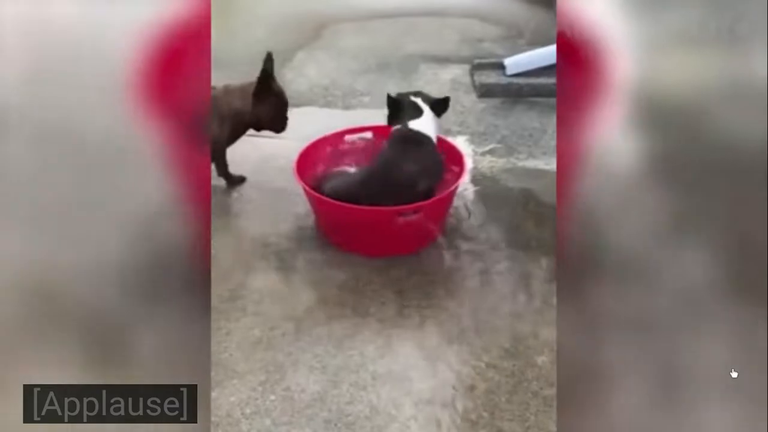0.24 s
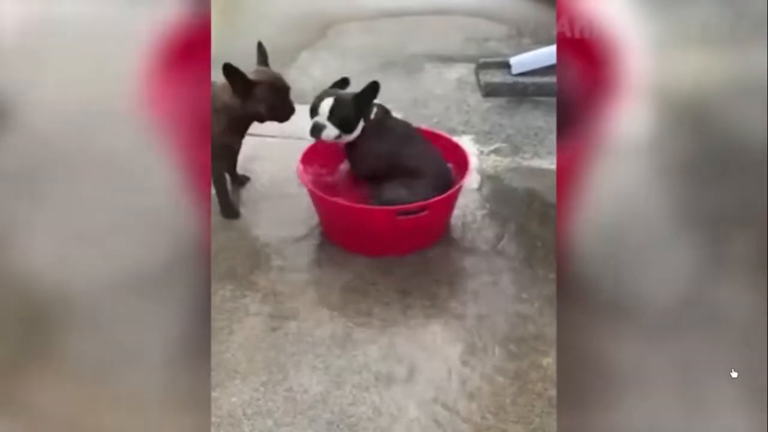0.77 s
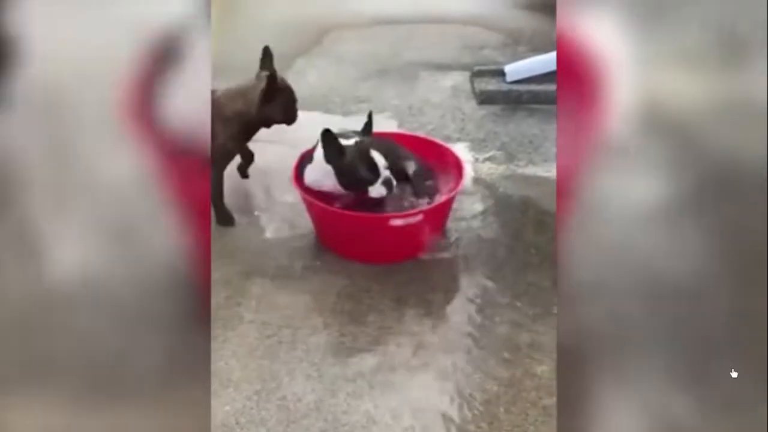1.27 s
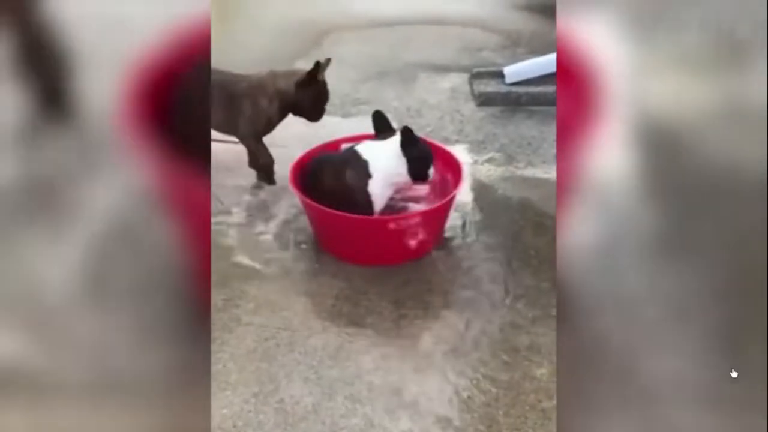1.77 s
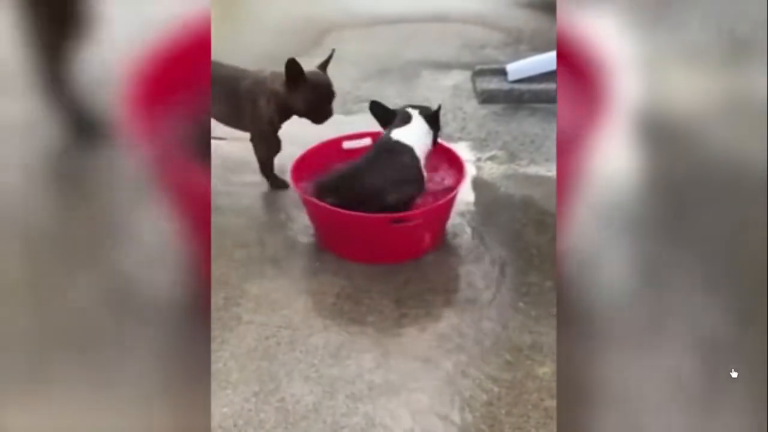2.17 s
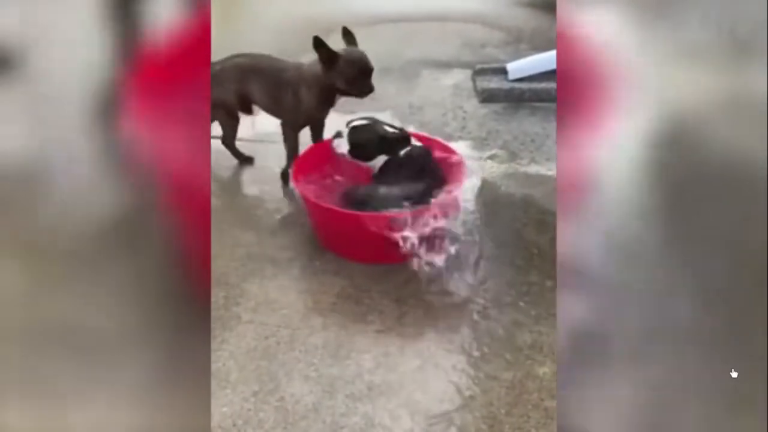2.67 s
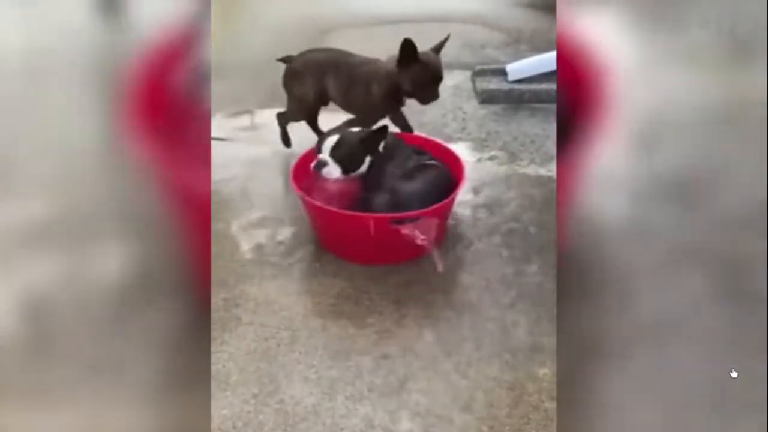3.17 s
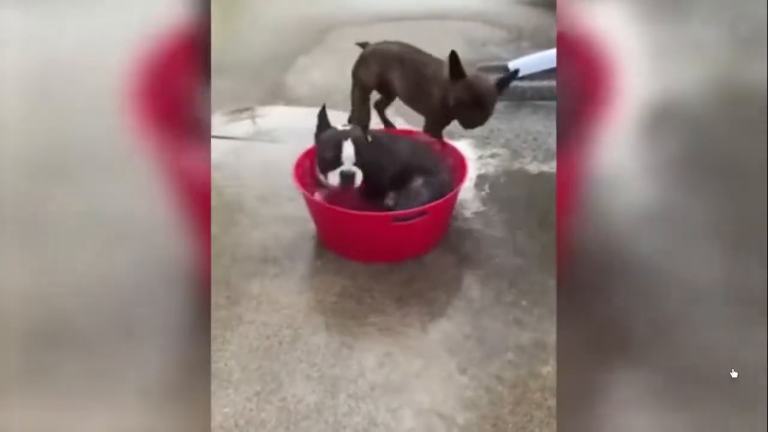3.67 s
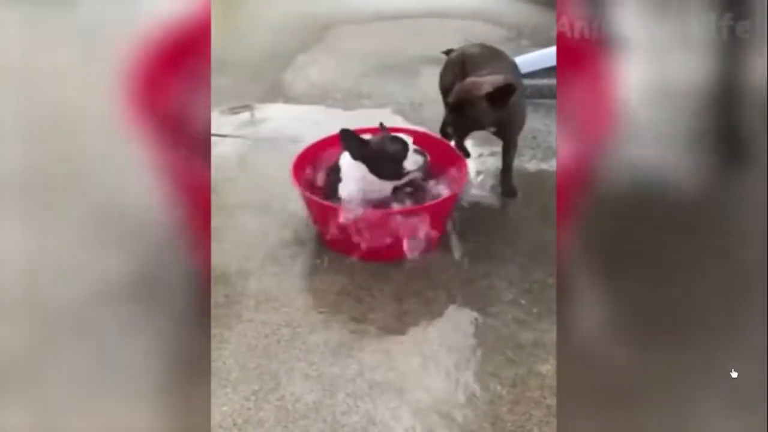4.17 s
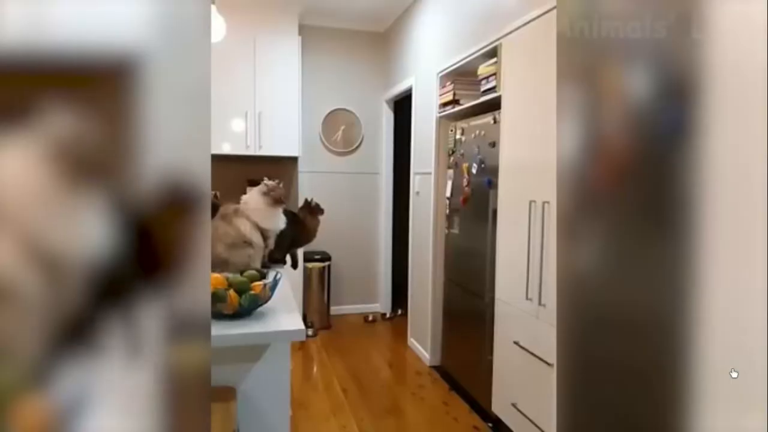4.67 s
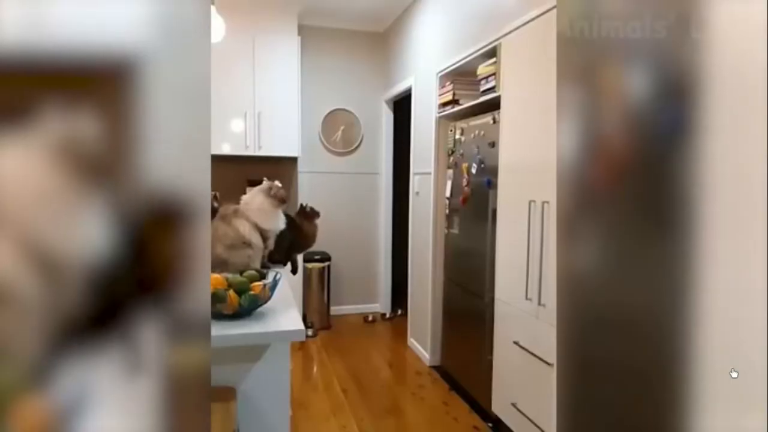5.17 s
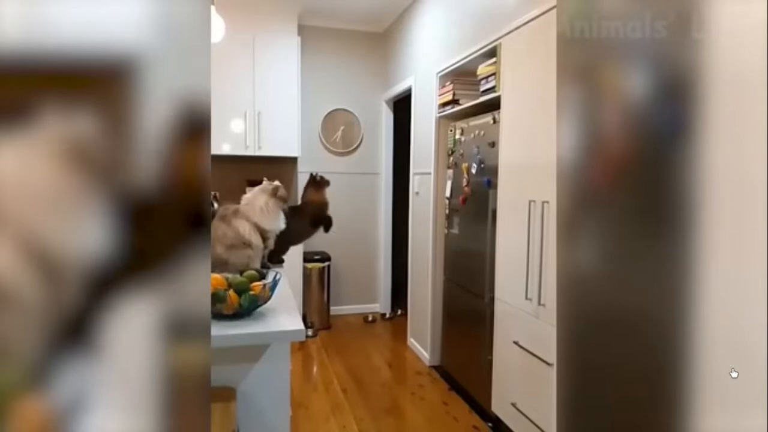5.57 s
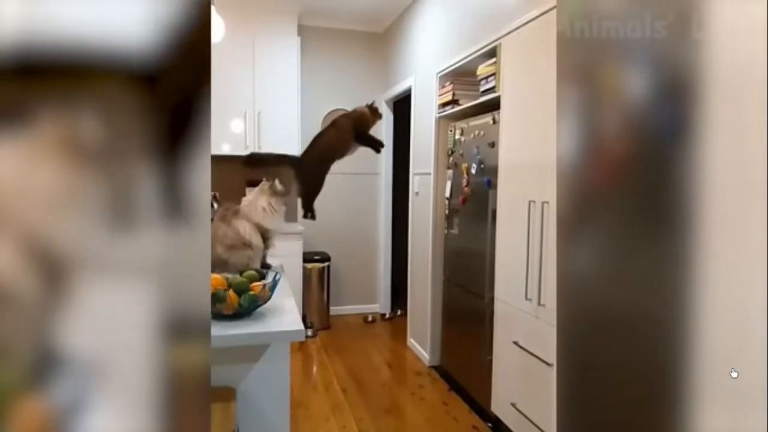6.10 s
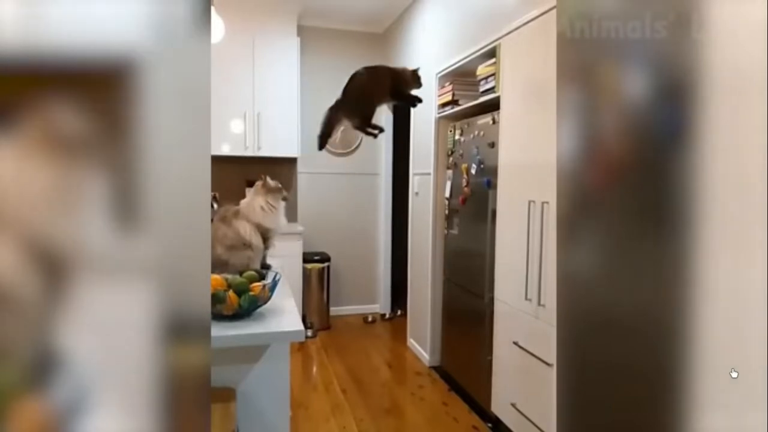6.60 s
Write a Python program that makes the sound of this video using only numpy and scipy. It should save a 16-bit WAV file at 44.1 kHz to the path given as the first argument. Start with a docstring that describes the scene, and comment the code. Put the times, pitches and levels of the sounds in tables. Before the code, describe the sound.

From the start, water sloshes close by in a hollow plastic tub as a small dog wriggles in it. Uneven surges come several times a second, full of gurgles, froth and sharp plops, while water slaps over the rim and spatters on concrete. The splashing is strongest around 2.2, 3 and 4.5 seconds, the loudest plops slightly overloading. Wet skin squeaks briefly on the plastic at about 3.8 seconds. A far motor hums faintly, growing a little toward the end of the splashing.

At about 4.7 seconds the sound cuts abruptly to a much quieter kitchen: room tone, a hollow whirr and a very faint high electrical whine. From 5 seconds until the end, near 7 seconds, come a few soft rustles and scuffs as a cat moves. A low rumble lies under both places.

```python
"""Water sloshes in a plastic tub as a small dog wriggles in it, close by, on a concrete yard.
Each slosh traps bubbles, big air pockets plop, and water slaps over the rim and spatters the ground.
Wet skin squeaks once on the plastic, a motor hums far off and the loudest plops overload.
Then the scene cuts to a quiet kitchen: room tone, a whirr, soft rustles and a faint whine.
A low rumble runs under both."""
import sys
import numpy as np
from scipy import signal
from scipy.fft import rfft, irfft
from scipy.io import wavfile
from scipy.ndimage import uniform_filter1d

SR = 44100
rng = np.random.default_rng(int(sys.argv[2]) if len(sys.argv) > 2 else 0)


def to_wav(s):
    """Save 16-bit WAV."""
    ch = np.atleast_2d(s).T  # columns
    pcm = np.round(np.clip(ch, -1, 1) * 32767)  # PCM
    wavfile.write(sys.argv[1], SR, pcm.astype(np.int16))


N = 301644
TIME = np.arange(N) / SR
HZ = np.fft.rfftfreq(N, 1 / SR)


def sloshing(attack_s=0.013, release_s=0.026, rest_hz=1850):
    """Each shove of the dog stirs the water. Returns wash, gurgle and froth gains, and froth pitch."""
    # Each row: start in s, length in s, relative wash, gurgle and froth levels in dB, froth pitch in Hz.
    shoves = [(0.056, 0.17, -50, -24.5, -29.5, 1800), (0.288, 0.12, -46, -26, -15.5, 2000),
              (0.41, 0.08, -40.5, -20, -13.5, 1760), (0.523, 0.043, -49.5, -17.5, -21, 1900),
              (0.624, 0.048, -43, -22, -17.5, 2250), (0.74, 0.067, -59, -21, -20.5, 2150),
              (0.835, 0.076, -38, -12.5, -19, 1900), (1.071, 0.0093, -31, -32, -14.5, 1830),
              (1.15, 0.2, -54, -28, -26.5, 1700), (1.32, 0.063, -61, -28, -19.5, 2050),
              (1.409, 0.09, -47, -27.5, -14.5, 2170), (1.487, 0.1, -38.5, -22.5, -18.5, 1650),
              (1.626, 0.13, -45.5, -26.5, -25, 2150), (1.79, 0.014, -35.5, -23.5, -12.5, 1510),
              (1.964, 0.038, -38.5, -32, -14.5, 2140), (2.212, 0.15, -38.5, -20.5, -20, 1800),
              (2.39, 0.15, -40, -19.5, -16.5, 2110), (2.582, 0.1, -34, -14, -14, 1850),
              (2.724, 0.25, -40.5, -21, -19.5, 1950), (2.981, 0.16, -38, -20, -12, 2105),
              (3.147, 0.11, -42, -24.5, -19, 2080), (3.345, 0.14, -39, -31, -19.5, 2400),
              (3.511, 0.2, -36, -21, -21, 2300), (3.743, 0.12, -34, -19, -15, 1750),
              (4.024, 0.12, -34, -21.5, -18.5, 1900), (4.166, 0.074, -38, -21.5, -12, 2350),
              (4.254, 0.055, -34.5, -20, -17, 1600), (4.358, 0.065, -37, -23, -18, 2100),
              (4.457, 0.28, -40, -24.5, -15.5, 2120)]
    rest_db = [[-43], [-27], [-26]]  # wash, gurgle, froth: the water never settles
    power = gain_of(rest_db) ** 2 * np.ones(N)
    weighted_hz = power[-1] * rest_hz
    for start_s, length_s, wash_db, gurgle_db, froth_db, hz in shoves:
        push = surge(start_s, length_s, attack_s, release_s)
        added = (gain_of([[wash_db], [gurgle_db], [froth_db]]) * push) ** 2
        power += added
        weighted_hz += added[-1] * hz
    return (*np.sqrt(power), weighted_hz / power[-1])


def churn():
    """Large trapped bubbles gurgle and small ones froth, over the dull wash of moving water."""
    # Each row of both: frequency in Hz, relative spectral level in dB.
    bubble_spectrum = [(250, -26), (500, -23.5), (700, -10.5), (880, -1), (1230, 0.5), (1650, -1),
                       (2150, 1.5), (2800, 2.5), (3300, 5.5), (3800, -3.5), (5000, -6)]
    wash_spectrum = [(90, -12), (170, 5.5), (205, -7.5), (245, -0.5), (330, -1.5), (410, 2), (500, -1),
                     (800, -19.5), (1500, -20)]
    wash_gain, gurgle_gain, froth_gain, froth_hz = sloshing()
    large = bubbles(450, 1400, per_s=450, ring_s=0.0075, spread_db=3.8)
    small = bubbles(1400, 3700, per_s=1000, ring_s=0.0042, spread_db=4.2, peak_hz=froth_hz)
    gurgle = gain_of(-3) * gurgle_gain * steadied(coloured(large, bubble_spectrum), samples=1800)
    froth = gain_of(-2.3) * froth_gain * steadied(coloured(small, bubble_spectrum), samples=1800)
    lapping = rng.standard_normal(N) * gain_of(2.5 * wander(0.03))
    return gurgle + froth + wash_gain * coloured(lapping, wash_spectrum)


def bubble(hz, ring_s, glide, attack):
    """One bubble swells quickly and dies as it surfaces, its pitch gliding with depth."""
    age = np.arange(int(4 * ring_s * SR) + 2) / (ring_s * SR)
    envelope = (1 - np.exp(-(age / attack) ** 2)) * np.exp(-0.8 * age ** 1.45)
    turns = np.cumsum(hz * (1 + glide * np.tanh(age - 0.5))) / SR
    return envelope / envelope.max() * np.sin(2 * np.pi * turns)


def bubbles(low_hz, high_hz, per_s, ring_s, spread_db, peak_hz=None, width_oct=0.59, sizes=60):
    """A swarm: large bubbles ring longer; those near peak_hz, if given, are strongest."""
    swarm = np.zeros(N)
    for hz in np.geomspace(low_hz, high_hz, sizes):
        life, glide, detune = rng.random(3)
        births = np.flatnonzero(rng.random(N // 8) < 8 * per_s / sizes / SR) * 8  # 8-sample grid
        gains = gain_of(spread_db * np.minimum(rng.exponential(1, 2000), 3))[:len(births)]
        if peak_hz is not None:
            gains *= 0.043 + np.exp(-(np.log2(hz / peak_hz[births]) / width_oct) ** 2)
        life_s = ring_s * (0.5 + life) * np.sqrt(low_hz / hz)
        tone = bubble(hz * (0.98 + 0.03 * detune), life_s, glide=0.32 * glide - 0.1, attack=0.39)
        for birth, gain in zip(births, gains):
            add(swarm, birth / SR, gain * tone)
    return swarm


def plops(highpass_hz=360):
    """Air pockets close under water and ring briefly, with their bass filtered away."""
    # Each row: start in s, level in dB, pitch in Hz, ring length in cycles.
    pockets = [(0.089, -5, 1530, 2.5), (0.193, -7, 3180, 7.5), (0.362, -3, 2050, 6.6),
               (0.401, -2.5, 2200, 4.8), (0.432, -6.5, 1080, 5.9), (0.454, 0, 1490, 4),
               (0.482, 0, 1640, 4.9), (0.635, -5.5, 923, 2.9), (0.647, -2.5, 2290, 6.5),
               (0.865, -7.5, 1273, 15.6), (0.888, -11, 940, 4.8), (0.928, -2, 2650, 5.5),
               (1.078, -5, 1376, 4), (1.143, -11, 1360, 5.9), (1.169, 0.5, 1260, 7), (1.247, -4, 1980, 4.3),
               (1.435, -8.5, 1560, 3.5), (1.503, -20, 368, 2.9), (1.535, -8, 1080, 2.7),
               (1.573, -5, 1600, 7.9), (1.733, -13, 1160, 5.1), (1.807, -5, 1210, 10.3),
               (1.913, 2.5, 2330, 6), (2.005, 1, 2100, 3.4), (2.277, 4, 1120, 2.3),
               (2.338, -3.5, 1100, 3.5), (2.373, -7.5, 2320, 7.8), (2.407, 0.5, 1050, 2.5),
               (2.496, 1, 2150, 11), (2.612, -7.5, 1004, 5.8), (2.623, -16.5, 820, 3.5),
               (2.656, -10.5, 622, 8.5), (2.678, -8, 1190, 6.7), (2.777, -6.5, 1420, 3.5),
               (2.792, -6, 2200, 8.5), (2.853, -5, 1160, 2.9), (2.863, -6.5, 1090, 4.8),
               (2.92, -8.5, 1300, 6.5), (3.01, 5, 2250, 2.6), (3.025, 2, 2270, 7.2),
               (3.052, -6.5, 787, 3.2), (3.087, 2.5, 2080, 9.8), (3.124, -3.5, 910, 2.7),
               (3.163, 5.5, 1042, 3.1), (3.244, -6.5, 2000, 8), (3.364, -2, 2300, 3.4),
               (3.678, -9.5, 612, 13.4), (3.681, -7, 1140, 4), (3.703, -15, 630, 3.4),
               (3.819, -5.5, 1680, 16), (3.843, 2, 1520, 1.6), (4.005, -10, 1290, 2.7),
               (4.045, -5, 1490, 1.9), (4.137, -9.5, 1100, 6.9), (4.27, -3.5, 1540, 6.3),
               (4.288, -14.5, 770, 7.7), (4.294, -6.5, 1650, 3.7), (4.468, -2.5, 1970, 4.5),
               (4.499, 6.5, 2130, 4.2), (4.609, 1, 2220, 9), (4.677, 2, 1980, 8), (4.715, -2.5, 1900, 3.5)]
    rings = np.zeros(N)
    for start_s, db, hz, cycles in pockets:
        glide = rng.normal(0.072, 0.08)  # most rise in pitch near the surface
        add(rings, start_s, gain_of(db) * bubble(hz, cycles / hz, glide, attack=0.3))
    return signal.sosfilt(signal.butter(3, highpass_hz, "highpass", fs=SR, output="sos"), rings)


def spilling(release_s=0.053, trickle_db=-28):
    """Water spills over the rim, above a steady trickle. Returns drop and hiss gains."""
    # Each row: start in s, length in s, attack in s, drop level in dB, hiss level in dB.
    spills = [(0.107, 0.29, 0.027, -18, -46), (0.263, 0.19, 0.025, -14.5, -46),
              (0.621, 0.058, .015, -18, -32), (0.765, 0.12, 0.012, -17.5, -32),
              (1.144, 0.093, .03, -17, -29), (1.259, 0.32, .16, -17, -26), (1.59, 0.056, 0.023, -18, -42),
              (1.916, 0.069, 0.025, -11.5, -21), (2.02, 0.066, 0.022, -20, -40.5),
              (2.198, 0.055, .035, -14, -15.5), (2.327, 0.25, 0.036, -25.5, -42.5),
              (2.631, 0.038, 0.036, -18, -44), (2.746, 0.22, 0.093, -16.5, -39),
              (2.99, 0.15, 0.036, -10.5, -24), (3.161, 0.1, 0.038, -21, -39),
              (3.317, 0.14, .02, -18.5, -40), (3.5, 0.12, 0.032, -19, -44.5),
              (3.677, 0.16, 0.093, -23.5, -30.5), (4.081, 0.31, 0.01, -19.5, -32.5),
              (4.446, 0.22, 0.031, -14, -28.5)]
    drop_power, hiss_power = np.zeros((2, N))
    for start_s, length_s, attack_s, drop_db, hiss_db in spills:
        flow = surge(start_s, length_s, attack_s, release_s)
        drop_power += (gain_of(drop_db) * flow) ** 2
        hiss_power += (gain_of(hiss_db) * flow) ** 2
    return np.sqrt(drop_power + gain_of(trickle_db) ** 2), np.sqrt(hiss_power)


def spatter(per_s, spread_db, mist_db):
    """Single drops tick in a fine mist."""
    sizes = gain_of(spread_db * np.minimum(rng.exponential(1, N), 4)) * rng.choice([-1, 1], N)
    ticks = unit_rms(sizes * (rng.random(N) < per_s / SR))
    return unit_rms(ticks + gain_of(mist_db) * rng.standard_normal(N))


def slaps(smack_hz=2700, shortest_s=0.002):
    """Sheets of water hit tub and concrete as dense bursts; air caught beneath smacks."""
    # Each row: start in s, relative level in dB, length in s (raised to shortest_s).
    landings = [(0.145, -15, 0.0059), (0.477, -4, 0.0059), (0.494, -10, 0.005), (0.531, -18, 0.003),
                (0.686, -5, 0.0013), (0.779, -18.5, 0.008), (0.83, -14, 0.0045), (0.857, -10.5, 0.02),
                (0.919, -3, 0.002), (1.061, -6, 0.00097), (1.161, -14, 0.009), (1.209, -10, 0.0065),
                (1.471, -10, 0.0078), (1.535, -13, 0.0044), (1.563, -13, 0.011), (1.739, -13, 0.004),
                (1.913, -7.5, 0.0058), (1.954, -11, 0.011), (2.109, -6.5, 0.0039), (2.439, -8.5, 0.0018),
                (2.529, -9, 0.0033), (2.901, -14, 0.005), (2.989, -10.5, 0.013), (3.101, -6, 0.029),
                (3.234, -18, 0.023), (3.327, -18, 0.009), (3.364, -10.5, 0.018), (3.444, -10, 0.0039),
                (3.582, -7, 0.0025), (3.822, -10, 0.0024), (4.148, -15.5, 0.0066), (4.223, -13.5, 0.013),
                (4.465, -3.5, 0.0026), (4.576, -9.5, 0.018), (4.654, -3.5, 0.0038)]
    bursts = np.zeros(N)
    for start_s, db, length_s in landings:
        samples = max(length_s, shortest_s) * SR
        age = np.arange(int(4 * samples)) / samples
        add(bursts, start_s, gain_of(db) * (1 - np.exp(-age / 0.037)) * np.exp(-age ** 2))
    sheets = gain_of(1.5) * bursts * spatter(per_s=7900, spread_db=4.5, mist_db=-9)
    smack = gain_of(-12.5) * signal.lfilter(*signal.iirpeak(smack_hz, 2, SR), sheets)
    return sheets + smack


def spray():
    """Drops land in clumps, tiny bubbles fizz, sheets slap and thin jets hiss."""
    # Each row of both: frequency in Hz, relative spectral level in dB.
    splash_spectrum = [(120, -52.5), (400, -36), (900, -11), (2500, -2.5), (4000, -6), (5300, -10),
                       (5780, -15.5), (6200, -2.5), (7100, -5.5), (7500, -4), (8600, 2), (10700, 1.5),
                       (11700, -2), (12500, -16)]
    jet_spectrum = [(4000, -28), (5900, -14), (6500, -1), (8000, -1.5), (9000, -3), (12000, -19)]
    fizz = unit_rms(bubbles(3800, 12000, per_s=900, ring_s=0.002, spread_db=3.5))
    ticks = spatter(per_s=3000, spread_db=1.5, mist_db=1.5)
    clumping = gain_of(1.8 * wander(0.018))
    drops = steadied((ticks + gain_of(-6.5) * fizz) * clumping)
    drop_gain, hiss_gain = spilling()
    splash = coloured(drop_gain * drops + slaps(), splash_spectrum)
    jets = hiss_gain * coloured(rng.standard_normal(N), jet_spectrum)
    return patchy(splash + jets, depth_db=2.2)


def squeak(hz=1690, roughness=0.04, octave_db=-10):
    """Wet skin sticks and slips on the tub wall: a rough, stuttering tone and its octave."""
    phase = 2 * np.pi * np.cumsum(hz * (1 + roughness * wander(0.0012))) / SR
    grip = surge(start_s=3.738, length_s=0.095, attack_s=0.06, release_s=0.033)
    stutter = gain_of(-12 + 5 * wander(0.005))
    return grip * stutter * (np.sin(phase) + gain_of(octave_db) * np.sin(2 * phase))


def tub(x):
    """The hollow plastic tub rings with whatever happens in it."""
    # Each row: frequency in Hz, bandwidth in Hz, gain in dB.
    modes = [(397.7, 27, 2), (669, 9.3, -4.5), (848, 26, -25), (1160, 110, -9.5), (1638, 57, -2.5),
             (2914, 22, 3)]
    return x + sum(gain_of(db) * signal.lfilter(*signal.iirpeak(hz, hz / width_hz, SR), x)
                   for hz, width_hz, db in modes)


def yard_echo(x, spacing=16):
    """Sparse reflections off tub and yard, each band dying at its own rate."""
    # Each row: frequency in Hz, time to fall 60 dB in s.
    decay = [(200, 0.085), (1000, 0.13), (3000, 0.056), (10000, 0.025)]
    taps = np.zeros(SR // 2)
    slots = np.arange(spacing * spacing // 2, len(taps) - spacing, spacing)
    taps[slots + rng.integers(0, spacing, len(slots))] = rng.choice([-1., 1.], len(slots))
    hz, time_s, bands = signal.stft(taps, SR, nperseg=256)
    tail = signal.istft(bands * gain_of(-60 * time_s / curve_at(decay, hz)[:, None]), SR)[1]
    return signal.fftconvolve(x, tail / np.linalg.norm(tail))[:N]


def side_reflections(x, max_delay_s=0.006):
    """Slightly late reflections from the sides spread the water into stereo."""
    # Each row: frequency in Hz, side level against mid in dB.
    width = [(150, -11.5), (350, -21), (700, -23.5), (1400, -18), (2700, -9.5), (5000, -2), (8500, -12),
             (12000, -17)]
    mid = rfft(x)
    delay_s = np.interp(HZ, np.linspace(0, SR / 2, 200), rng.uniform(0, max_delay_s, 200))
    lag = np.exp(-2j * np.pi * np.cumsum(delay_s) * SR / N)
    reflected = irfft(mid * gain_of(curve_at(width, HZ)) * lag, N)
    # Each drop lands elsewhere, so its reflection's phase keeps changing.
    side = rfft((signal.hilbert(reflected) * np.exp(2j * wander(0.008))).real)
    left_db = curve_at([(200, -0.29), (2000, -0.012), (4500, -0.13), (10000, -1.2)], HZ)
    return irfft(np.array([mid + side, mid - side]) * gain_of([left_db, -left_db]), N)


def water(echo_db=-14, cutoff_hz=12150):
    """Water and squeak ring the tub and echo round the yard."""
    direct = tub(churn() + plops() + squeak() + spray())
    echoing = direct + gain_of(echo_db) * yard_echo(direct)
    return lowpass(side_reflections(echoing), cutoff_hz)


def motor(hz=145):
    """A far motor hums, wavering in pitch and level."""
    # Each row: time in s, relative level in dB.
    levels = [(0.0, -56), (1.46, -45.5), (1.64, -51.5), (2.67, -35.5), (2.76, -45), (3.55, -46),
              (4.47, -35), (4.74, -37.5)]
    turns = np.cumsum(hz * (1 + 0.01 * wander(0.075))) / SR
    level_db = np.interp(TIME, *np.transpose(levels)) + 2 + 2.2 * wander(0.06)
    return gain_of(level_db) * np.sin(2 * np.pi * turns)


def rustles():
    """Soft scuffs: short swells of band noise with a flickering level."""
    # Each row: middle in s, level in dB, centre frequency in Hz, half-length in s.
    scuffs = [(5.09, -54, 2470, 0.044), (5.178, -50, 1600, 0.028), (5.307, -53, 2020, 0.027),
              (5.45, -53.5, 2410, 0.068), (5.74, -53, 1510, 0.038), (5.85, -53.5, 2690, 0.045),
              (5.876, -54, 8350, 0.028), (5.967, -56, 4700, .04), (6.05, -53, 2300, 0.052),
              (6.49, -57, 1910, .03), (6.79, -56.5, 4580, 0.065)]
    mix = np.zeros((2, N))
    for middle_s, db, hz, half_s in scuffs:
        band = [(hz / 2, -26), (hz * 0.85, -12), (hz, 0), (hz * 1.22, -12), (hz * 2, -26)]
        swell = np.exp(-((TIME - middle_s) / half_s) ** 2)
        mix += gain_of(db) * swell * stereo_noise(band, side_db=-4)
    return mix * gain_of(3 * wander(0.004))


def kitchen(whirr_db=-51.5, air_db=-53.5, whine_db=-62, whine_hz=15700):
    """Room tone with a hollow whirr, rustles and a fuzzy electrical whine."""
    # Each row of both: frequency in Hz, relative spectral level in dB.
    air_spectrum = [(88, -24), (150, 2), (194, 0), (551, -10), (1030, -8.5), (1210, -15.5), (1400, -12.5),
                    (1570, -4.5), (3150, -14.5), (12000, -16), (15600, -43), (22000, -120)]
    whirr_spectrum = [(600, -53), (820, 7), (900, 7), (1080, 10), (1220, -8), (1400, 12),
                      (1600, -26), (2300, -4), (3500, -43)]
    whirr = stereo_noise(whirr_spectrum, side_db=-48)
    scuffs = rustles()
    whirr *= gain_of(whirr_db + 1.6 * wander(0.07))
    air = gain_of(air_db) * stereo_noise(air_spectrum, side_db=-0.5)
    whine = gain_of(whine_db) * unit_rms(wander(0.005) * np.sin(2 * np.pi * whine_hz * TIME))
    return air + whirr + scuffs + whine


def rumble(mid_db=-38, side_db=-43.5):
    """Low noise, its deepest part alike in both channels."""
    # Each row of both: frequency in Hz, relative spectral level in dB.
    mid_spectrum = [(12, 3), (25, -4.5), (42, 2), (60, -14), (78, -7.5), (100, -12), (130, -16),
                    (200, -43.5), (400, -44.5)]
    side_spectrum = [(15, -9), (45, -2.5), (70, -10), (100, -9.5), (200, -27.5), (400, -39.5)]
    side = gain_of(side_db) * coloured(rng.standard_normal(N), side_spectrum)
    mid = gain_of(mid_db) * coloured(rng.standard_normal(N), mid_spectrum)
    return np.array([mid + side, mid - side])


def gain_of(db):
    """Decibels to amplitude factor."""
    return 10 ** (np.asarray(db) / 20)


def unit_rms(x):
    """Scales to rms 1."""
    return x / np.sqrt(np.mean(x ** 2) + 1e-20)


def curve_at(points, hz):
    """Interpolates (Hz, value) points on a log-frequency axis."""
    point_hz, values = np.transpose(points)
    return np.interp(np.log(hz + 1), np.log(point_hz + 1), values)


def coloured(x, spectrum):
    """Shapes x by (Hz, dB) points; white noise keeps its power."""
    return irfft(rfft(x) * unit_rms(gain_of(curve_at(spectrum, HZ))), N)


def stereo_noise(spectrum, side_db):
    """Noise of a given colour and width."""
    mid, side = coloured(rng.standard_normal((2, N)), spectrum)
    return mid + gain_of(side_db) * side * np.array([[1], [-1]])


def add(mix, start_s, sound):
    """Mixes a sound in place."""
    part = mix[round(start_s * SR):][:len(sound)]
    part += sound[:len(part)]


def surge(start_s, length_s, attack_s, release_s):
    """Envelope: linear rise, hold until length_s after the start, exponential fall."""
    age_s = TIME - start_s
    return np.clip(age_s / attack_s, 0, 1) * np.exp(-np.maximum(age_s - length_s, 0) / release_s)


def wander(scale_s):
    """Smooth random curve of rms 1 that changes on this time scale."""
    return unit_rms(irfft(rfft(rng.standard_normal(N)) * np.exp(-(HZ * scale_s) ** 2), N))


def steadied(x, samples=3000):
    """Holds a random stream near rms 1, keeping its grain."""
    power = uniform_filter1d(uniform_filter1d(x ** 2, samples), samples // 2)
    return x / np.sqrt(abs(power) + 0.035 * np.mean(x ** 2))


def patchy(x, depth_db, bins=14, frames=16):
    """Shifts the colour in random patches of frequency and time."""
    bands = signal.stft(x, nperseg=512)[2]
    patches = uniform_filter1d(rng.standard_normal(bands.shape), bins, axis=0)
    patches = unit_rms(uniform_filter1d(patches, frames, axis=1))
    return signal.istft(bands * gain_of(depth_db * patches))[1][:N]


def lowpass(x, hz):
    """Steep low-pass on both channels."""
    taps = signal.firwin(255, hz, window=("kaiser", 7), fs=SR)
    return signal.oaconvolve(x, taps[None], "same")


def scene(cut_s=4.745, crossfade_s=0.0085, tail_s=0.027):
    """The yard, then the kitchen, over a low rumble."""
    outdoors = np.clip((cut_s - TIME) / crossfade_s + 0.5, 0, 1)
    tail = gain_of(-10.5) * np.exp(-np.maximum(TIME - cut_s, 0) / tail_s)
    yard = (water() + motor()) * np.maximum(outdoors, tail)
    return yard + kitchen() * (1 - outdoors) + rumble()


def record(dry, cutoff_hz=16000):
    """Soft clipping at full scale, then a band limit."""
    clipped = dry / (1 + abs(dry) ** 8) ** (1 / 8)
    return lowpass(clipped, cutoff_hz)


dry = scene()
out = record(dry)
to_wav(out)
```